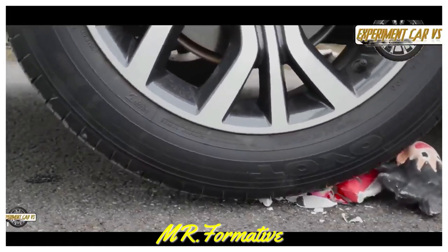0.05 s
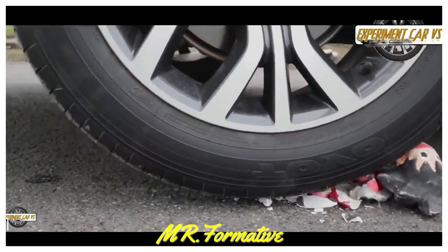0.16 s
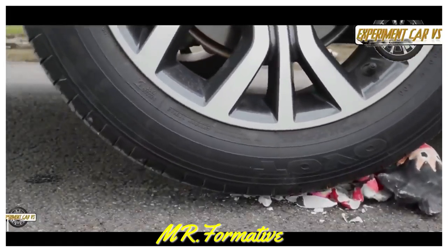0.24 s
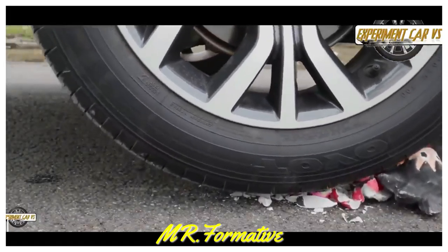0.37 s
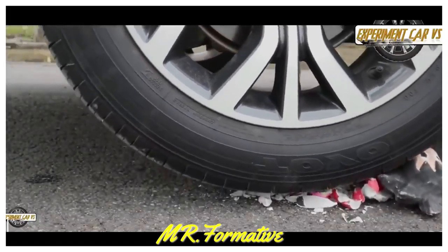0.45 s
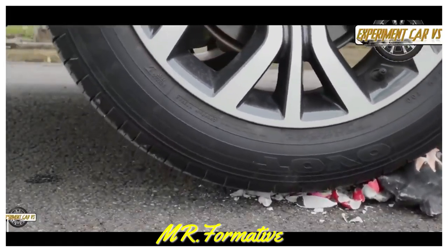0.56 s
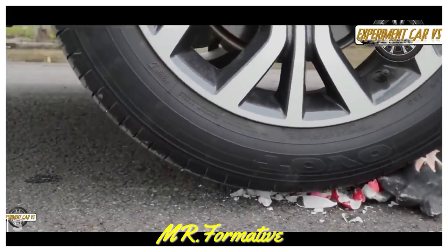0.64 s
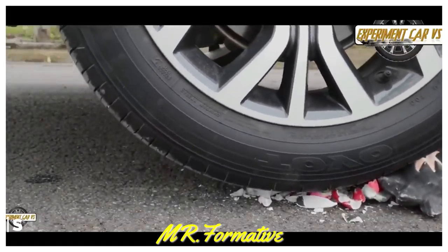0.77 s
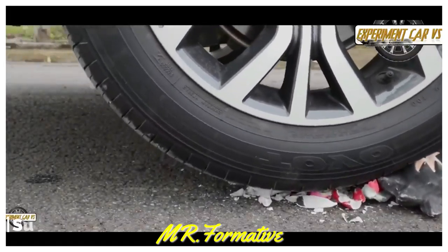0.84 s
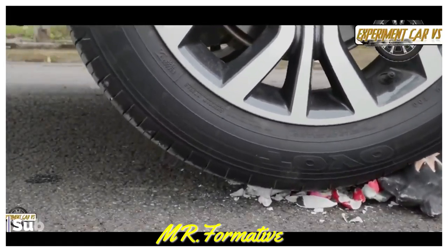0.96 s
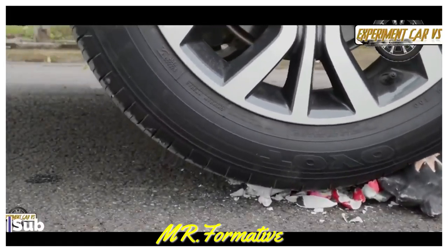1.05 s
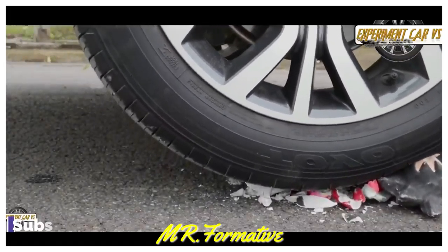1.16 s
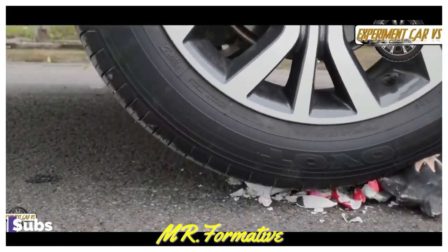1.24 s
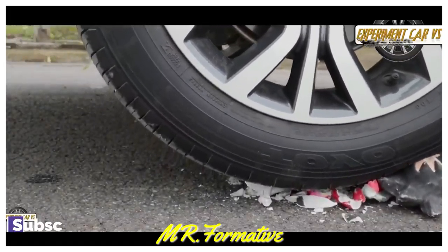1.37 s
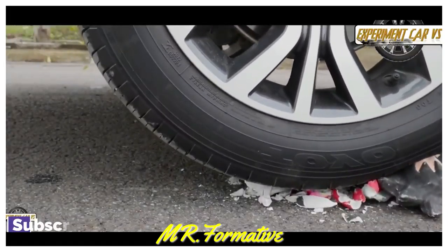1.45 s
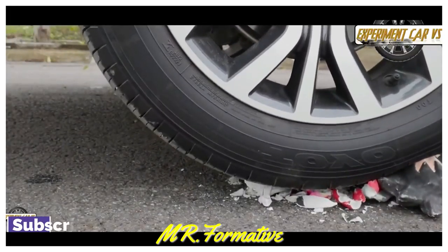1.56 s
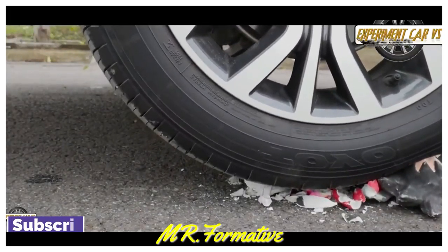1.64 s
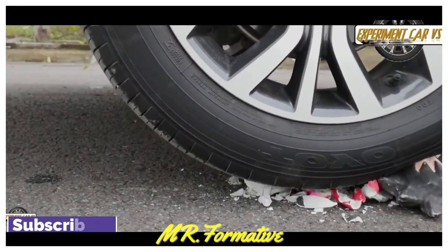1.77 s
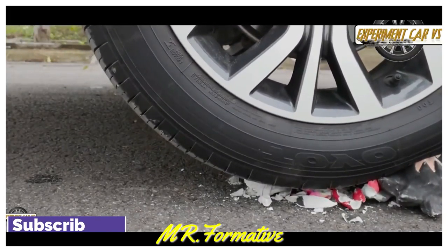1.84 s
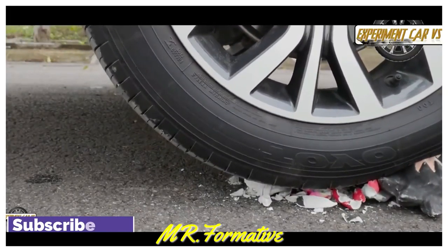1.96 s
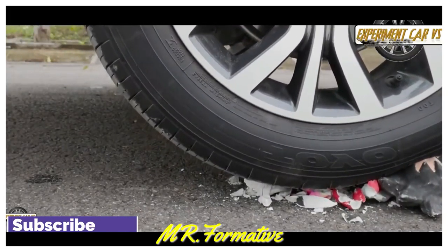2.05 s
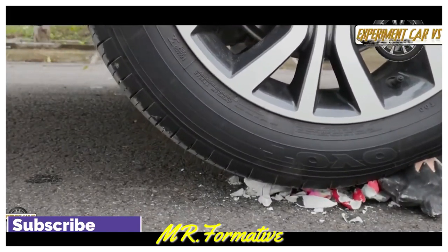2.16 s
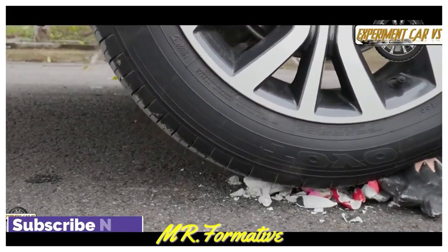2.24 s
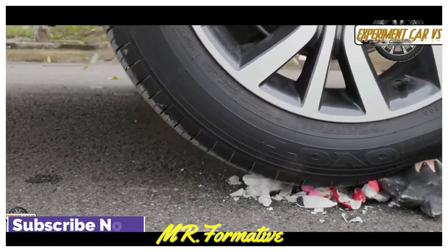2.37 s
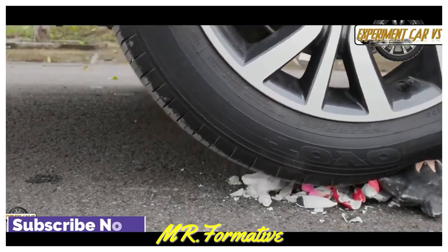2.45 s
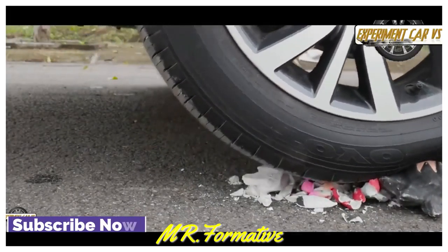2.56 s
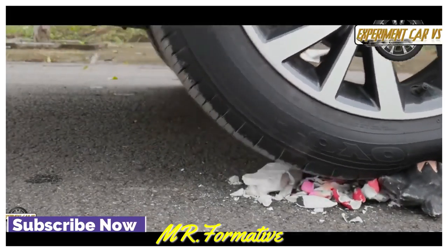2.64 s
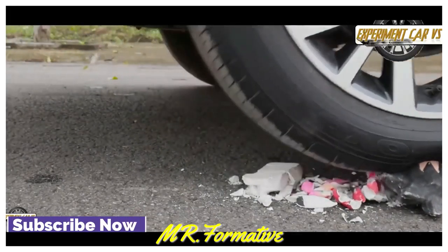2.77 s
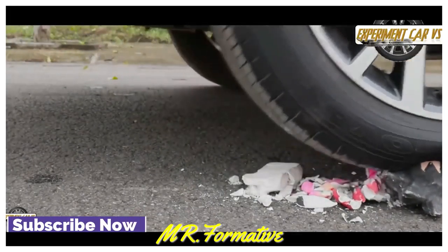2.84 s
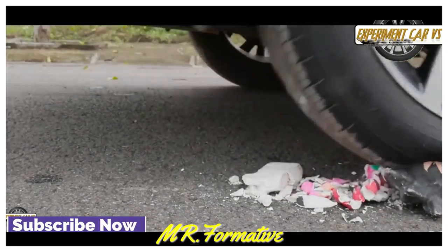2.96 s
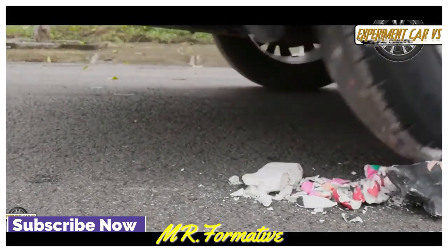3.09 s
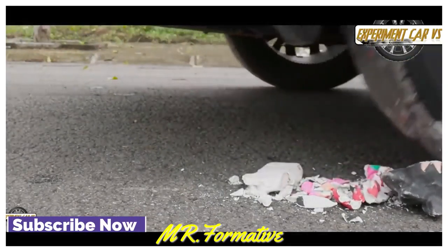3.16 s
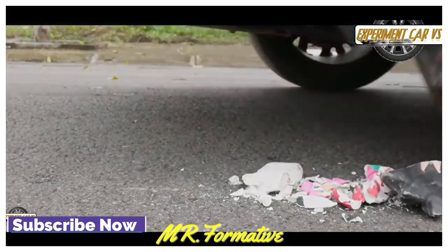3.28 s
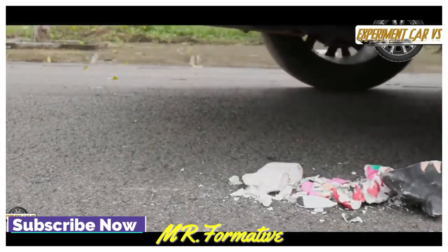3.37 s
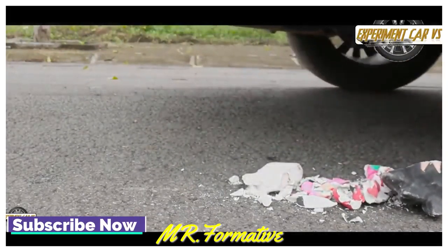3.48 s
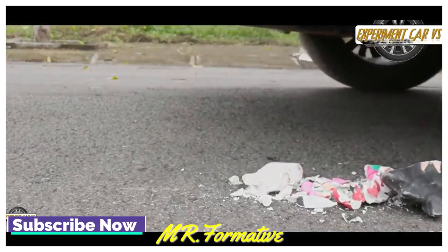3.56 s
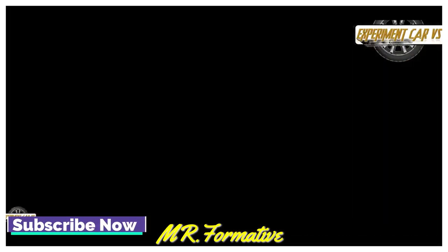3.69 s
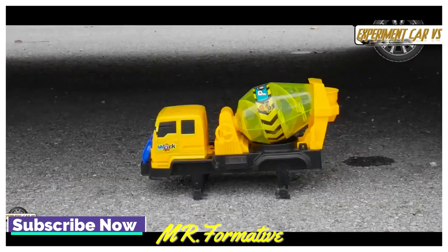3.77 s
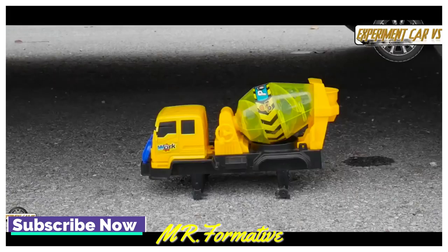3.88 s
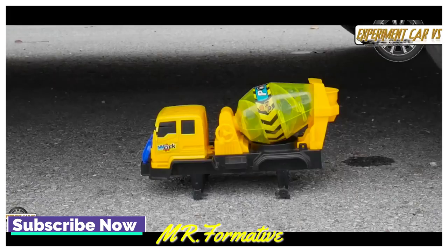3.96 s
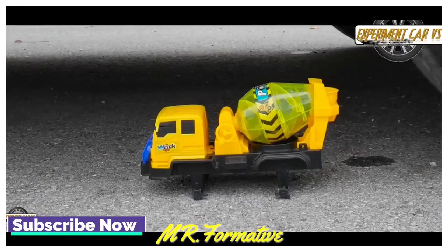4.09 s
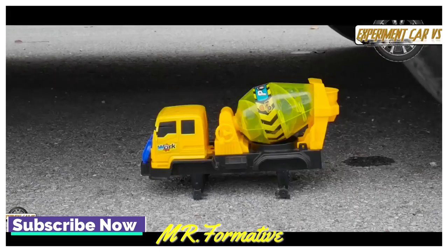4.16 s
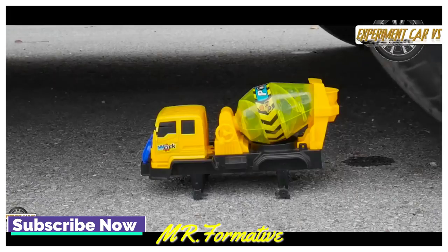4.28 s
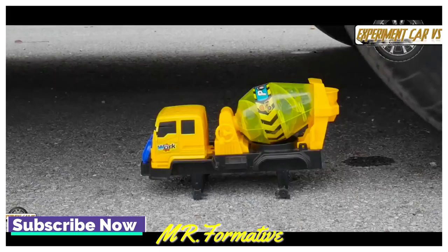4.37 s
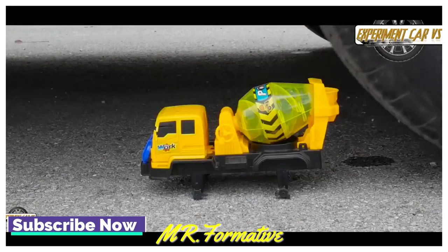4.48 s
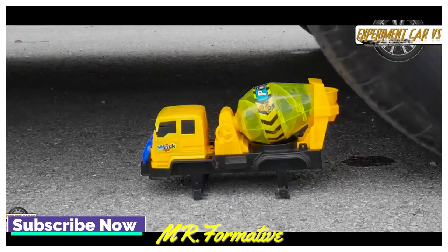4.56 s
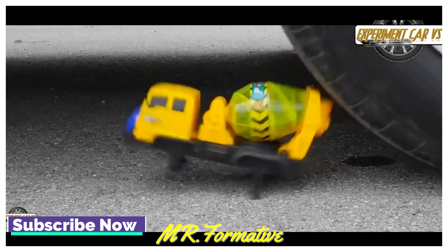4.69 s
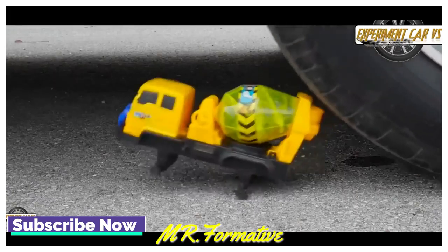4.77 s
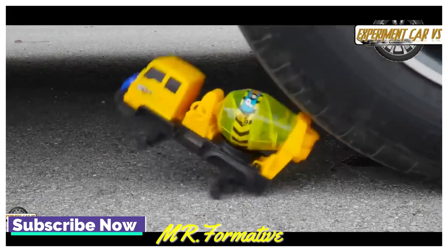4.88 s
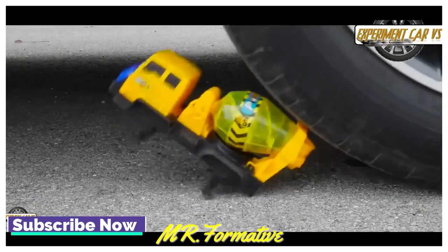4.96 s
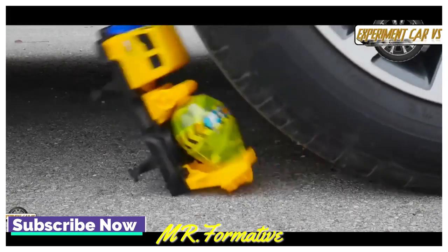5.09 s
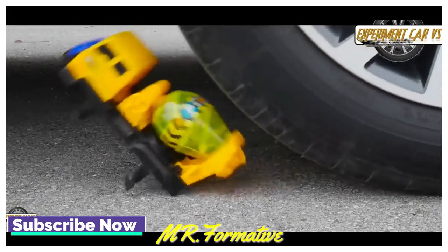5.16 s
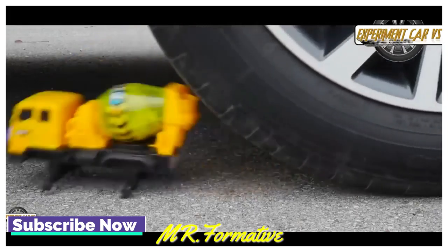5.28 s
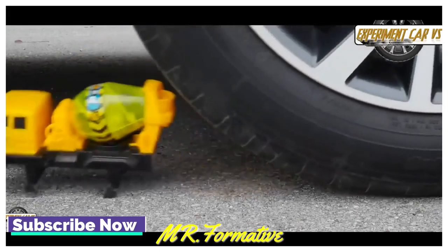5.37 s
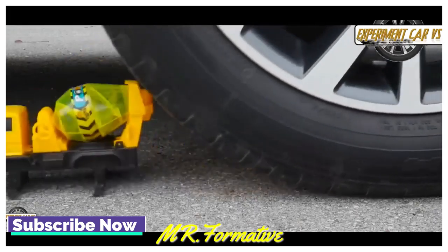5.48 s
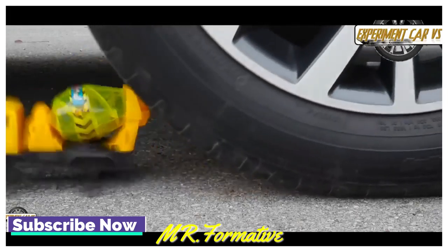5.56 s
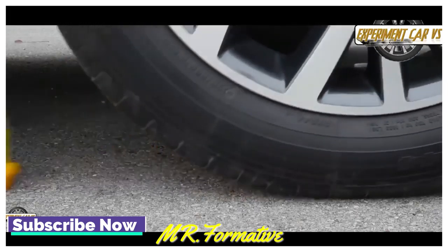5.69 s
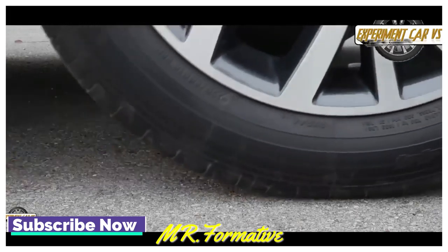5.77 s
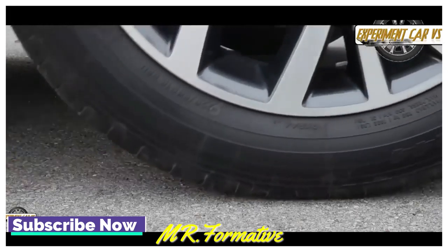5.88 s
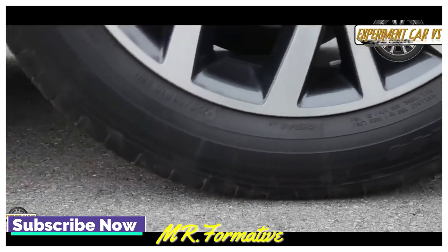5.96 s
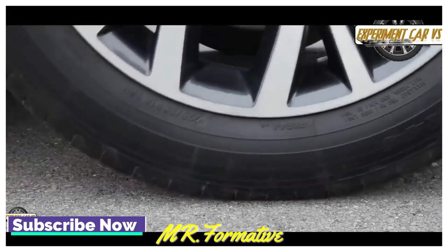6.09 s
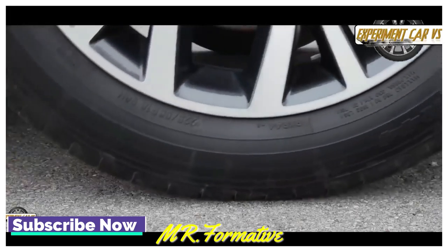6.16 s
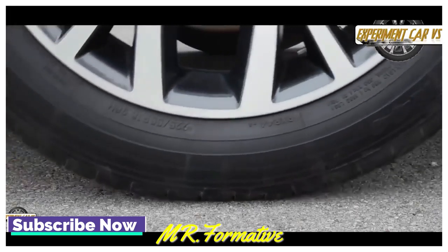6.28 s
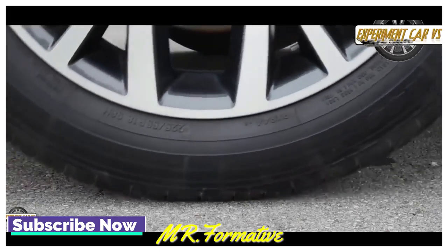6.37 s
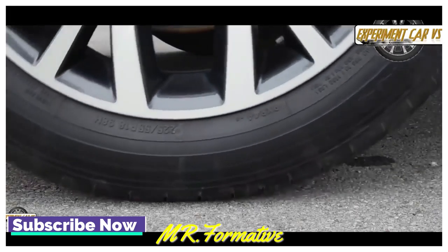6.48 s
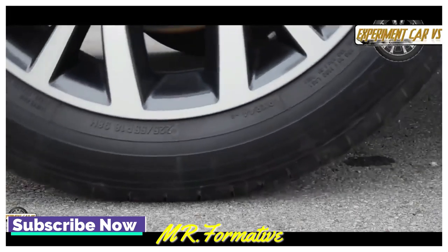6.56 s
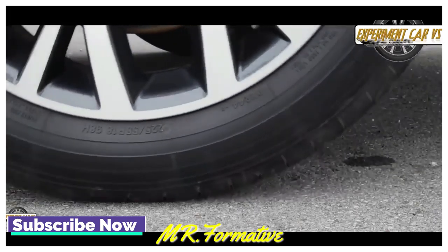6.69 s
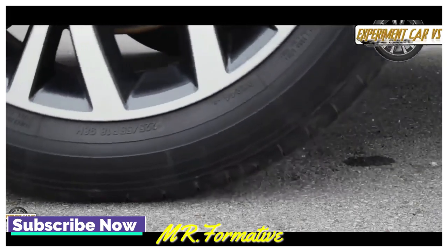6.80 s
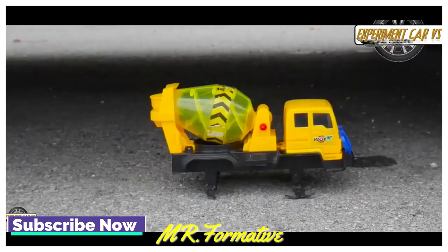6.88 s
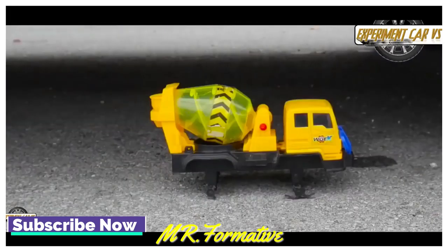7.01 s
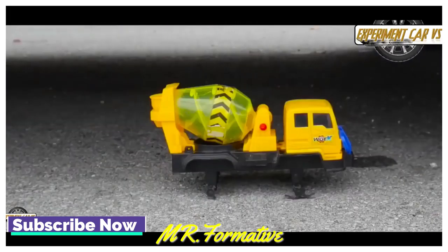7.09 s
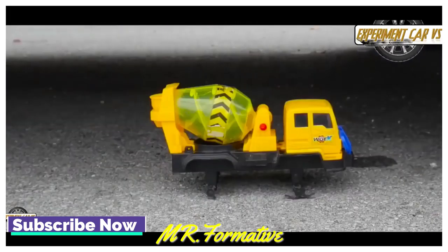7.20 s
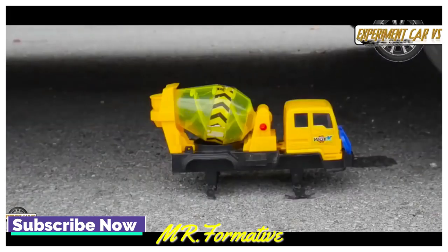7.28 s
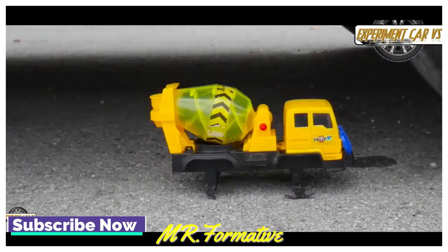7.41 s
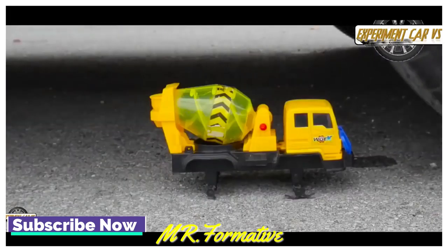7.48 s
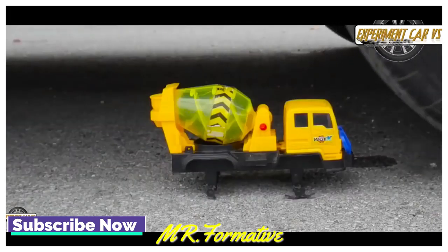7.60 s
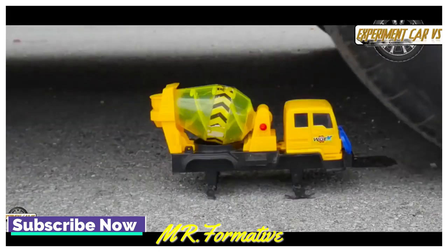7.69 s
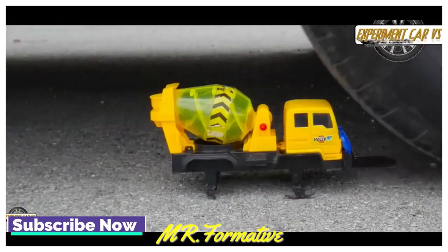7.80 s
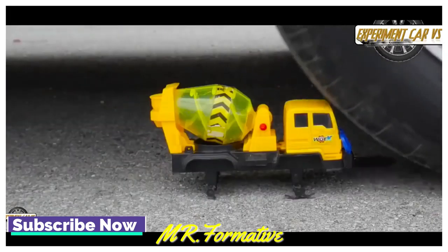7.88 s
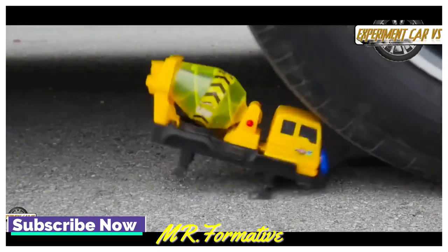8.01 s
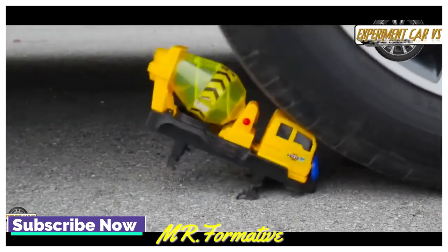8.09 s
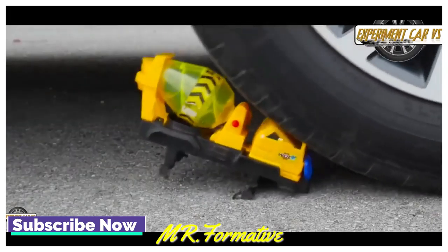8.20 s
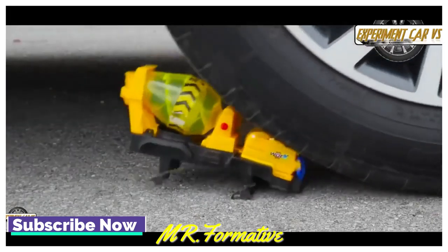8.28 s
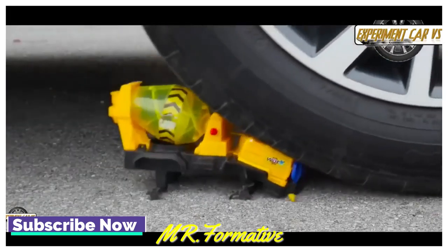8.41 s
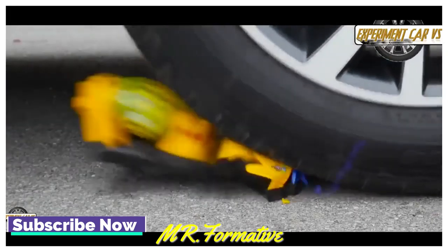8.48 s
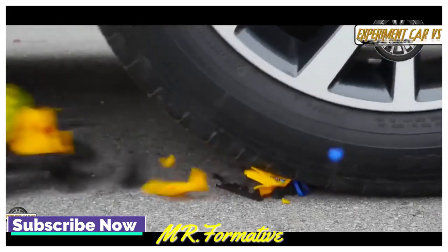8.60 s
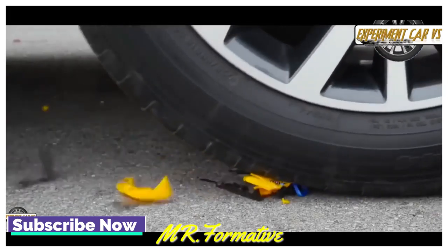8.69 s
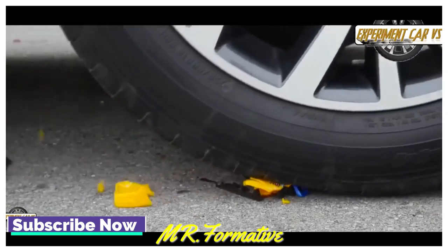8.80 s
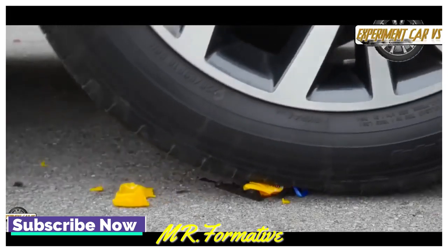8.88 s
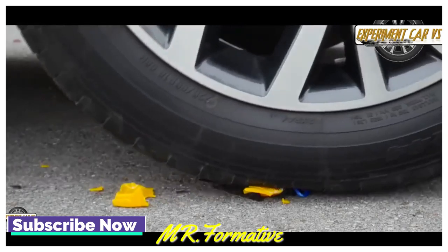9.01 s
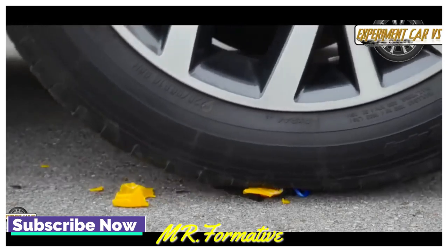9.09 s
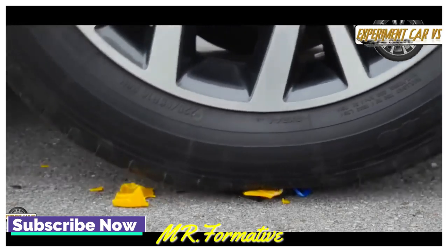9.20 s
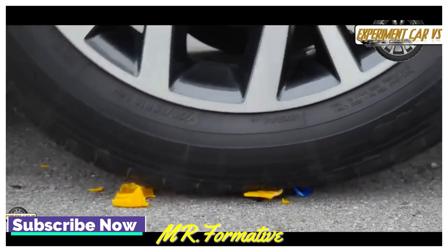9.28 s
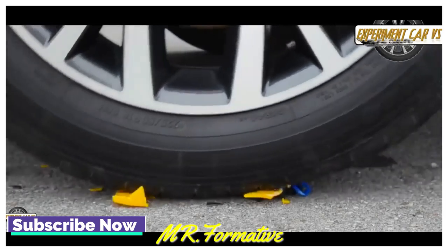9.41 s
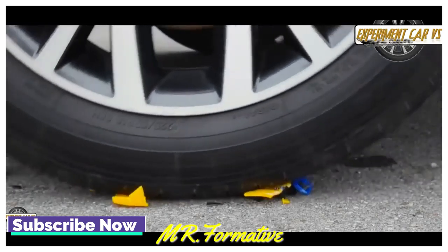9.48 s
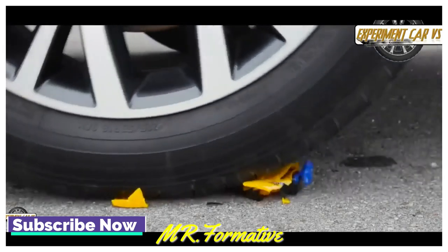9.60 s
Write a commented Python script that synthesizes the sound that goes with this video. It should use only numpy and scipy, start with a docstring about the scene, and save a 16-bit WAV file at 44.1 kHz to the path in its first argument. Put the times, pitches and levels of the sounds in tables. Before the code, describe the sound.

Close by a slow tyre, a hollow toy cracks and crumbles, a plastic truck rattles and scrapes along asphalt, then breaks with sharp snaps.

```python
"""On asphalt a car creeps over toys, heard by a microphone on the ground beside its tyre.
A brittle hollow figure caves in and its shards are ground down: dying swarms of tiny slips ring each piece.
A plastic toy truck is shoved along: scraping feet and knocks ring its panels and shell.
On the next pass the truck is caught and snaps to pieces. The tyre booms softly under the breaks,
over filtered-noise rolling and an engine hum."""
import sys
import numpy as np
from scipy import signal
from scipy.fft import rfft, irfft
from scipy.io import wavfile
from scipy.ndimage import uniform_filter1d

SR = 44100
rng = np.random.default_rng(int(sys.argv[2]) if len(sys.argv) > 2 else 0)


def file_out(sig):
    """Save sig as 16-bit WAV at sys.argv[1]."""
    # one column per channel
    cols = np.atleast_2d(sig).T
    # limit, then scale
    lim = np.clip(cols, -1, 1)
    pcm = np.round(lim * 32767).astype(np.int16)
    wavfile.write(sys.argv[1], SR, pcm)


N = 425565

# the figure caves in: (time [s], level [dB], decay [s], size of the piece [cm])
FIGURE_CRACKS = [(0.184, 18, 0.0024, 3.3), (0.2493, 13, 0.0038, 2.4), (0.268, 20, 0.0033, 1.8),
                 (0.353, 8, 0.0032, 1.8), (0.3655, 10, 0.0034, 2.2), (0.5123, 13, 0.00099, 1.5),
                 (0.519, 26.5, 0.0024, 2), (0.523, 21.5, 0.003, 7.4), (0.532, 17, 0.0046, 2.8),
                 (0.5667, 23, 0.0013, 1.87), (0.6357, 31.5, 0.0029, 2.03), (0.7267, 20, 0.004, 5.3),
                 (0.7321, 20, 0.0041, 1.7), (0.798, 14, 0.0055, 2.7), (2.2755, 27, 0.00074, 4.13),
                 (2.9225, 14.5, 0.00035, 2.9), (3.0096, 23.5, 0.0051, 2), (3.06, 15, 0.0047, 5.2),
                 (3.1383, 24, 0.0045, 4), (3.166, 16.5, 0.004, 6.5), (3.491, 13.5, 0.0022, 4.8),
                 (3.5026, 13.5, 0.015, 4.1)]
# colour of the figure's cracks: (frequency [Hz], relative level [dB])
FIGURE_COLOUR = [(60, -26), (120, -1), (200, 2.5), (600, -4.5), (1200, -7), (2500, -16), (4200, -14.5),
                 (7000, -18.5), (11000, -23), (15500, -39.5)]
# hollow body of the figure: (resonance [Hz], boost [dB])
FIGURE_BODY = [(285, 5.5), (590, 8), (850, 4)]
# colour of snapping plastic: (frequency [Hz], relative level [dB])
SNAP_COLOUR = [(40, -25), (200, -11), (400, -12.5), (850, -2), (1500, -6.5), (4000, -5.5), (5500, -8),
               (7500, -6.5), (11500, -6.5), (13000, -14.5), (15500, -20)]
# colour of the truck against the road: (frequency [Hz], relative level [dB])
KNOCK_COLOUR = [(40, -40), (130, -20.5), (400, -20.5), (600, -11), (820, -3), (1150, -5.5), (2100, -5.5),
                (2700, -10.5), (4300, -10), (5500, -17.5), (7200, -18.5), (11000, -24.5), (15500, -39.5)]
# hollow body of the truck: (resonance [Hz], level [dB])
SHELL = [(795, 1), (875, -3)]
# where the four tilts of a burst's colour apply: frequency [Hz]
TILT_HZ = [250, 850, 3000, 10000]
# the pause between two passes: start [s], end [s]
SILENCE = (3.735, 3.875)
SHELL_FLEX = 0.05  # share by which the pitch of the truck's shell typically shifts as it flexes
RIPPLE_DB = 3.4  # how unevenly each piece rings across the treble


def gain_of(db):
    """Decibels to amplitude."""
    return 10 ** (np.asarray(db) / 20)


def evened(x):
    """Scales to rms 1."""
    return x / np.sqrt(np.mean(x ** 2) + 1e-20)


def read(points, hz):
    """Reads (Hz, value) rows on a log-frequency axis."""
    f, value = np.transpose(points)
    return np.interp(np.log(hz + 1), np.log(f + 1), value)


def curves(rows):
    """Each column of a timed table, sample by sample."""
    s, *columns = np.transpose(rows)
    return [np.interp(np.arange(N) / SR, s, c) for c in columns]


def add(mix, s, sound):
    """Mixes a sound in at time s."""
    part = mix[max(round(s * SR), 0):][:len(sound)]
    part += sound[:len(part)]


def wander(hz):
    """Slow chance of rms 1, up to about hz."""
    lowpass = np.exp(-(np.fft.rfftfreq(N, 1 / SR) / hz) ** 2)
    return evened(irfft(rfft(rng.standard_normal(N)) * lowpass, N))


def causal(gain):
    """The spectrum with this magnitude that starts sharply and rings afterwards."""
    log_gain = np.log(np.maximum(gain, 1e-5))
    circle = np.concatenate([log_gain, log_gain[-2:0:-1]])
    return np.exp(np.conj(signal.hilbert(circle)))[:len(gain)]


def ring(x, modes):
    """Dying modes (Hz, dB, t60 s) driven by x; each has its dB as gain at resonance."""
    t = np.arange(SR) / SR
    response = 0
    for hz, db, t60 in modes:
        fade = gain_of(-60 * t / t60)
        onset = np.minimum(t * hz, 1)
        response = response + gain_of(db) * 2 * fade / fade.sum() * np.sin(2 * np.pi * hz * t) * onset
    return signal.oaconvolve(x, response)[:N]


def resonate(x, hz, width):
    """A resonance of gain 1 that follows the curve hz."""
    turn = np.exp(2j * np.pi * np.cumsum(hz) / SR)
    r = np.exp(-np.pi * width / SR)
    # shift the resonance down to 0 Hz, smooth there, and shift back
    smooth = signal.lfilter([1 - r], [1, -r], x / turn + 1e-18)
    return 2 * (turn * smooth).real


def burst(colour, level_db, decay, tilts_db=(0, 0, 0, 0), clump=0, ripple_db=0, rings=(), rise=0.18,
          size=4096):
    """A dying swarm of tiny slips, coloured by the piece and its rings (Hz, width Hz, dB)."""
    t, hz = np.arange(size) / SR, np.fft.rfftfreq(size, 1 / SR)
    slips, sizes, peaks = rng.standard_normal((3, size))
    envelope = np.exp(clump * sizes - t / decay) * (1 - np.exp(-t / (rise * decay)))
    swarm = rfft(slips * envelope)
    # the slips share their energy over all pitches
    spread = np.sqrt(uniform_filter1d(abs(swarm) ** 2, size=110))
    # each piece has its own high resonances
    ripple = evened(uniform_filter1d(uniform_filter1d(peaks, size=40), size=20))[:len(hz)]
    ripple = ripple * np.tanh(hz / TILT_HZ[2])
    shape_db = level_db + read(colour, hz) + read(list(zip(TILT_HZ, tilts_db)), hz) + ripple_db * ripple
    for ring_hz, width, db in rings:
        shape_db += db / (1 + (2 * (hz - ring_hz) / width) ** 2)
    return irfft(swarm * causal(gain_of(shape_db) / spread))


def deformed(body):
    """The rings of a hollow body (Hz, width Hz, dB), a little shifted each time it is squashed."""
    body_q, shift = 6, 0.07  # sharpness of the rings; typical share by which their pitch shifts
    return [(hz * np.exp(shift * rng.standard_normal()), hz / body_q, db) for hz, db in body]


def breaks(rows, colour, clump, focus_db, purity, body=(), ring_width_hz=900, ring_db=8):
    """Pieces give way under the tread, each loudest at its own pitch and weaker per octave away from it."""
    piece_hz = 11830  # pitch of a piece 1 cm across; it falls with the square of the size
    clean_snap_s = 0.0018  # here the loss per octave is focus_db; longer cracks are less pitched
    out = np.zeros(N)
    for s, level_db, decay, size_cm, *ring_hz in rows:
        octaves = abs(np.log2(np.array(TILT_HZ) * size_cm ** 2 / piece_hz))
        tilts_db = -focus_db * (clean_snap_s / decay) ** purity * (octaves - octaves.mean())
        rings = [(hz, ring_width_hz, ring_db) for hz in ring_hz] + deformed(body)
        add(out, s, burst(colour, level_db, decay, tilts_db, clump, RIPPLE_DB, rings))
    return out


def grains(per_s, spread_db):
    """Sparse clicks at rms 1: most are small, a few large."""
    signs = np.sign(rng.standard_normal(N))
    sizes = gain_of(spread_db * np.minimum(rng.exponential(1, N), 3))
    present = rng.random(N) < per_s / SR
    return evened(signs * sizes * present)


def chips(per_s=160, spread_db=4, decay=0.0006, ripple_db=6, count=10):
    """Small shards split under the tread; each of a few kinds has a ring of its own."""
    out = np.zeros(N)
    for _ in range(count):
        shard = evened(burst(SNAP_COLOUR, 0, decay, ripple_db=ripple_db))
        out += signal.oaconvolve(grains(per_s / count, spread_db), shard)[:N]
    return evened(out)


def car_levels():
    """Rumble, road noise and grit in dB, and the share of crunch: the idling car with the rolls over it."""
    # the car stands idling: (until [s], rumble [dB], hiss [dB])
    idling = [(3.64, -52, -48.5), (6.548, -61, -55.5), (6.999, -63.5, -60), (9.7, -59, -56.5)]
    # the tyre rolls: (full level from [s], full level until [s], rumble [dB],
    # road noise at mid-roll [dB], grit at mid-roll [dB], share of crunch [0-1])
    rolls = [(0.0, 0.276, -43.5, -43, -46, 0.4), (0.616, 0.8, -45.5, -51.5, -48.5, 0.5),
             (2.396, 3.2, -36.5, -39.5, -43.5, .2), (4.782, 6.412, -52, -41.5, -47, .4),
             (8.3, 9.38, -54.5, -54, -45, 0.76)]
    swell_db_per_s, die_db_per_s = 63.5, 84  # the rise before a roll and the fall after it
    build_db = 3  # growth of road noise and grit over a roll, as debris gathers under the tread
    idle_grit_db = -4  # fine hiss, relative to the hiss
    t, crunch = np.arange(N) / SR, np.zeros(N)
    until, rumble_db, hiss_db = np.transpose(idling)
    idle_db = np.array([rumble_db, hiss_db, hiss_db + idle_grit_db])
    power = gain_of(idle_db)[:, np.searchsorted(until[:-1], t)] ** 2
    for start, end, rumble_db, road_db, grit_db, share in rolls:
        slopes_db = np.minimum((t - start) * swell_db_per_s, (end - t) * die_db_per_s)
        swell_db = np.minimum(0, slopes_db)
        debris_db = swell_db + build_db * np.interp(t, [start, end], [-.5, .5])
        power += gain_of([rumble_db + swell_db, road_db + debris_db, grit_db + debris_db]) ** 2
        crunch += share * gain_of(swell_db)
    return *(10 * np.log10(power)), np.clip(crunch, 0, 1)


def street_band(x, lo_hz, hi_hz):
    """One band of x in the colour of the street, at rms 1."""
    # street and tyre noise: (frequency [Hz], relative density [dB per Hz])
    street = [(45, -11), (90, 0), (330, -6.5), (780, 6), (1500, -3), (2400, -8), (3300, -5), (5500, -12.5),
              (8300, -18), (11300, -15), (12600, -22), (15500, -27)]
    hz = np.fft.rfftfreq(N, 1 / SR) + 1
    band = 1 / np.sqrt((1 + (lo_hz / hz) ** 8) * (1 + (hz / hi_hz) ** 8))
    return evened(irfft(rfft(x) * band * gain_of(read(street, hz)), N))


def rolling(rumble_db, road_db, grit_db, share, lumpy_db=5):
    """Tread rumble and road noise; on debris part of the hiss is splitting chips, in uneven lumps."""
    low, middle, high = rng.standard_normal((3, N))
    crunch = chips()
    rumble = gain_of(rumble_db) * street_band(low, 75, 450)
    road = gain_of(road_db) * street_band(middle + share * crunch, 450, 2500)
    gritty = np.sqrt(1 - share) * high + np.sqrt(share) * crunch
    grit = gain_of(grit_db) * street_band(gritty, 2200, SR / 2)
    lumps = gain_of(lumpy_db * share * wander(25))
    return rumble + lumps * (road + grit)


def engine(rumble_db, follow=1.4, offset_db=7.5, waver=0.003):
    """A low hum at the firing rate, which swells with the rumble as the car climbs onto the toys."""
    # engine speed: (time [s], firing rate [Hz])
    firing = [(2.1, 55.6), (2.65, 72.8), (2.9, 76.1), (3.5, 65.4)]
    # overtones: (multiple of the firing rate, relative level [dB])
    orders = [(1, -2), (2, -7.5), (6, -7.5)]
    hz, = curves(firing)
    turns = np.cumsum(hz * (1 + waver * wander(14.0))) / SR
    hum = sum(gain_of(db) * np.sin(2 * np.pi * k * turns) for k, db in orders)
    return gain_of(follow * rumble_db + offset_db) * hum


def thumps():
    """The tyre drops onto the road as something gives way: each drop is one push on the tread."""
    # drops: (time [s], push that drives the tyre [dB])
    drops = [(0.0, 29), (0.271, 22.5), (0.52, 41), (0.566, 35), (0.638, 26), (0.728, 32), (2.277, 34.5),
             (3.01, 27.5), (5.765, 22), (8.534, 28), (8.689, 25.5), (8.834, 24.5)]
    out = np.zeros(N)
    for s, level_db in drops:
        add(out, s, gain_of([level_db]))
    return out


def rubber_thud(drops):
    """The rubber answers each drop with a short, low, damped mode."""
    # rubber: (resonance [Hz], gain [dB], t60 [s])
    rubber = [(120, -6.5, 0.36)]
    return ring(drops, rubber)


def tyre(blows, wave_db, cavity_db, start_hz=330, end_hz=115, first=0.018, last=0.066):
    """A blow rings the air in the tyre and sends a bending wave round the tread; high notes return first."""
    cavity_hz, cavity_t60 = 204.2, 1.1  # the air ring inside the tyre (Hz, s)
    t = np.arange(0, last - first, 1 / SR)
    hz = start_hz * (end_hz / start_hz) ** (t / t[-1])
    # the tread scatters the wave, which blurs its phase
    scatter = evened(uniform_filter1d(rng.standard_normal(SR), size=600))[:len(t)]
    phase = 2 * np.pi * np.cumsum(hz) / SR + uniform_filter1d(scatter, size=100)
    chirp = signal.windows.tukey(len(t), .5) * np.sin(phase)
    out = ring(blows, [(cavity_hz, cavity_db, cavity_t60)])
    add(out, first, gain_of(wave_db) * signal.oaconvolve(blows, chirp / abs(rfft(chirp)).max()))
    return out


def underbody(x):
    """Dense reflections between road and car, the treble dying first."""
    # echo: (frequency [Hz], t60 [s])
    echo_times = [(800, 0.15), (12000, 0.096)]
    taps = rng.standard_normal(SR // 2)
    hz, t, z = signal.stft(taps, SR, nperseg=256)
    fade = gain_of(-60 * t / read(echo_times, hz)[:, None])
    tail = signal.istft(z * fade, SR, nperseg=256)[1]
    tail *= 1 - np.exp(-np.arange(len(tail)) / SR / 0.011)  # the echo builds up over some 11 ms
    return signal.oaconvolve(x, tail / np.linalg.norm(tail))[:N]


def caving_in():
    """The hollow figure cracks piece by piece, its squashed body ringing with each crack."""
    return breaks(FIGURE_CRACKS, FIGURE_COLOUR, clump=0.55, focus_db=4.5, purity=0.37, body=FIGURE_BODY)


def crumbling(below_db=-14, decay=0.01):
    """After each crack of the figure, crumbs break off its edge in a ragged tail."""
    out = np.zeros(N)
    for s, level_db, *_ in FIGURE_CRACKS:
        crumbs = burst(FIGURE_COLOUR, level_db + below_db, decay, clump=0.94, ripple_db=RIPPLE_DB, rise=1)
        add(out, s, crumbs)
    return out


def ticks(figure_decay=0.0011, truck_decay=0.0008, bright_db=4):
    """Single shards split: the figure's with a dull tock, the truck's with a thin, bright click."""
    # loose shards tick under the tread: (time [s], level [dB])
    shards = [(0.2856, 15.5), (1.3689, 8.5), (2.272, 17), (2.3923, 9.5), (2.646, 11), (2.699, 8),
              (2.7272, 13.5), (2.8446, 16), (2.932, 13), (2.9582, 13.5), (2.98, 13), (2.991, 9), (3.096, 5),
              (3.225, 12.5), (8.43, 1), (8.473, 6.5), (8.523, 16), (8.7241, 7), (9.235, 7), (9.4243, -3),
              (9.4992, 8)]
    truck_tilts_db = (-bright_db, -bright_db, 0, bright_db)
    out = np.zeros(N)
    for s, level_db in shards:
        if s < SILENCE[0]:
            rings = deformed(FIGURE_BODY)
            tick = burst(FIGURE_COLOUR, level_db, figure_decay, ripple_db=RIPPLE_DB, rings=rings)
        else:
            tick = burst(SNAP_COLOUR, level_db, truck_decay, truck_tilts_db, ripple_db=RIPPLE_DB)
        add(out, s, tick)
    return out


def scrape(slips_per_s=1800, slip_db=4.5, judder_db=8, judder_hz=130, screech_hz=1650, screech_db=-1,
           groan_db=-8):
    """Plastic feet stick and slip in uneven judders; the shell groans and a screech wanders in pitch."""
    # the truck's feet drag over the asphalt: (start [s], end [s], level [dB])
    drags = [(4.836, 4.88, -18.5), (4.965, 5.212, -23.5), (5.38, 5.833, -27), (5.88, 6.34, -40.5),
             (6.305, 6.431, -23.5), (8.092, 8.319, -18)]
    pressure, hz = np.zeros(N), np.fft.rfftfreq(N, 1 / SR)
    for start, end, level_db in drags:
        window = signal.windows.tukey(max(int((end - start) * SR), 2), .5)
        add(pressure, start, gain_of(level_db) * window)
    judder = gain_of(judder_db * np.tanh(wander(judder_hz)))
    slips = grains(slips_per_s, slip_db) * judder
    body = evened(irfft(rfft(slips) * causal(gain_of(read(KNOCK_COLOUR, hz))), N))
    # the contact with the rough road shifts, and the screech with it
    screech = resonate(body, screech_hz * 2 ** (.22 * wander(30)), 180)
    groan = resonate(body, SHELL[0][0] * (1 + SHELL_FLEX * wander(20)), 70)
    voices = gain_of(screech_db) * evened(screech) + gain_of(groan_db) * evened(groan)
    return pressure * evened(body + voices)


def rattle(clump=.6, strike_db=-2.5, chatter_db=-8.0, chatter_s=0.01):
    """The shoved truck drags and hops: strikes ring a panel, loose parts chatter, the flexing shell rings."""
    # the truck hits the road: (time [s], level ahead of the strike and chatter offsets [dB],
    # brightness [dB], ring of the struck panel [Hz])
    knocks = [(4.855, 30, -2.5, 1900), (4.9018, 30, -6, 2350), (4.9127, 25, 3.5, 4160),
              (4.9435, 23, -4.5, 1550), (5.002, 25, -4.5, 1540), (5.0122, 26, 5.5, 1530),
              (5.0235, 25.5, -3, 910), (5.031, 27.5, -3, 1900), (5.0562, 26, -6.5, 1630),
              (5.1222, 27.5, 7, 2950), (5.1527, 24.5, -27, 1230), (5.1676, 34.5, -6, 1070),
              (5.1783, 27, 5, 2240), (5.2445, 30, 9, 6850), (5.263, 16.5, -3, 820), (5.2857, 28, 0.5, 1730),
              (5.4156, 26, -14, 2080), (5.4514, 27, 1, 1590), (5.4815, 29, -5, 1770),
              (5.5101, 26.5, -2, 1280), (5.5507, 22.5, -5, 1340), (5.6002, 27.5, -1, 940),
              (5.6487, 24.5, -2, 3760), (5.6798, 19.5, 3, 3000), (5.7206, 22, -11, 1350),
              (5.7582, 30.5, -7, 1240), (5.7695, 37, -3, 1990), (5.896, 31, 6.5, 7100),
              (5.971, 25.5, 2, 837), (6.046, 27, 0.5, 3700), (6.123, 19.5, -4, 840),
              (6.2031, 30.5, -1.5, 4700), (6.2572, 23.5, -5, 1920), (6.3134, 26, -4.5, 4500),
              (6.357, 18.5, -5, 1870), (6.3813, 22, -7, 1260), (8.1336, 24.5, -7.5, 1490),
              (8.1504, 11, -11, 1700), (8.1613, 29.5, -14, 1470), (8.193, 19.5, -5, 1980),
              (8.206, 25, -16, 1840), (8.2207, 26.5, -43, 844), (8.2365, 23.5, 6, 890)]
    # a usual knock; harder ones are shorter, their decay halving every so many dB
    usual_db, usual_decay_s, halving_db = 22.5, 0.0033, 25.5
    # hard and bright knocks put less of their strength into the body of the toy
    body_per_db, body_per_bright_db = -0.08, -0.11
    panel_q, panel_db = 4.5, 9  # how sharply and how strongly the struck panel rings
    shell_t60 = 0.13  # s
    out = scrape()
    for s, level_db, bright_db, panel_hz in knocks:
        force_db = level_db - usual_db
        decay = usual_decay_s * .5 ** (force_db / halving_db)
        body_db = body_per_db * force_db + body_per_bright_db * bright_db
        tilts_db = (body_db / 2, body_db, 0, bright_db)
        panel = [(panel_hz, panel_hz / panel_q, panel_db)]
        # a loose part is smaller than the panel, and rings higher
        part_hz = panel_hz * (1 + rng.random())
        loose = [(part_hz, part_hz / panel_q, panel_db)]
        strike = burst(KNOCK_COLOUR, level_db + strike_db, decay, tilts_db, clump, RIPPLE_DB, panel, rise=1)
        chatter = burst(KNOCK_COLOUR, level_db + chatter_db, chatter_s, tilts_db, 0.86, RIPPLE_DB, loose)
        add(out, s, strike)
        add(out, s, chatter)
    flex = 1 + SHELL_FLEX * wander(21)
    width_hz = np.log(1000) / np.pi / shell_t60
    shell = sum(gain_of(db) * resonate(out, hz * flex, width_hz) for hz, db in SHELL)
    return out + shell


def snapping():
    """The caught truck snaps to pieces; each crack has one sharp resonance besides its own pitch."""
    # snaps: (time [s], level [dB], decay [s], size of the piece [cm], sharpest resonance [Hz])
    truck_snaps = [(8.3107, 25.5, 0.0019, 3.1, 1780), (8.3166, 23.5, 0.0014, 3.3, 1580),
                   (8.365, 26, 0.0037, 2.5, 11500), (8.4048, 23.5, 0.002, 2.8, 6700),
                   (8.4168, 20.5, 0.0045, 1.8, 3550), (8.4404, 26, 0.00076, 3.1, 4200),
                   (8.5168, 20.5, 0.0013, 2.4, 7250), (8.5342, 28.5, 0.0021, 5.6, 2450),
                   (8.6011, 9.5, 0.00078, 1.6, 11000), (8.6901, 29.5, 0.0049, 2.4, 4580),
                   (8.7323, 14, 0.0016, 1.6, 4040), (8.8327, 16.5, 0.0011, 1.25, 6770),
                   (8.9166, 5, 0.00021, 0.92, 7600), (9.0376, 18.5, 0.00037, 1.32, 3670),
                   (9.065, 14, 0.00044, 1.36, 7400), (9.1673, 22.5, 0.00077, 5.1, 4150),
                   (9.2575, 15.5, 0.0016, 3.8, 920), (9.3125, 19.5, 0.0017, 3.5, 1010),
                   (9.3199, 10.5, 0.0017, 0.81, 4130), (9.357, 7.5, 0.00017, 4.6, 1010),
                   (9.4635, 20.5, 0.00029, 3.56, 1110), (9.4659, 12, 0.0018, 1.5, 4400),
                   (9.5283, 19, 0.0019, 2.95, 6900)]
    return breaks(truck_snaps, SNAP_COLOUR, clump=0.52, focus_db=2.5, purity=0.32)


def skids():
    """Loose shards skid over the road, each with a short, dry rasp."""
    # skids: (time [s], level [dB], decay [s])
    rasps = [(8.803, 7.5, 0.0071), (8.944, 14.5, 0.013), (9.14, 18, 0.0048), (9.204, 8, 0.014)]
    # colour of a rasp: (frequency [Hz], relative level [dB])
    rasp_colour = [(200, -31), (2100, -2.5), (4800, -7.5), (15500, -26.5)]
    out = np.zeros(N)
    for s, level_db, decay in rasps:
        add(out, s, burst(rasp_colour, level_db, decay, clump=0.58, ripple_db=RIPPLE_DB))
    return out


def scene():
    """Almost everything sounds the same in both channels; only a faint, blurred hiss differs between them."""
    # level of a faint side hiss, ahead of its overall gain: (frequency [Hz], level [dB])
    side_hiss = [(60, -21), (700, -35.5), (15000, -3)]
    rumble_db, road_db, grit_db, crunch = car_levels()
    car = rolling(rumble_db, road_db, grit_db, crunch) + engine(rumble_db)
    drops = thumps()
    figure = caving_in() + crumbling()
    knocks = ticks() + rattle() + skids()
    snaps = snapping()
    boom = tyre(drops, wave_db=-9.5, cavity_db=8)
    boom += tyre(figure + gain_of(-5) * snaps, wave_db=-3.5, cavity_db=-9.0)
    echoing = gain_of(-19.5) * figure + gain_of(-21.5) * snaps + gain_of(-14.0) * knocks
    middle = figure + snaps + knocks + boom + rubber_thud(drops) + underbody(echoing) + car
    hiss_gain = gain_of(read(side_hiss, np.fft.rfftfreq(N, 1 / SR)))
    hiss = irfft(rfft(underbody(car)) * hiss_gain, N)
    side = gain_of(-44.5) * underbody(middle) + gain_of(-4.0) * hiss
    return np.array([middle + side, middle - side])


def record(dry, fade=0.053, ceiling=0.78):
    """The sound drops out between two passes; the loudest cracks overload; then the band limit."""
    edge_hz = 15900
    t = np.arange(N) / SR
    heard = np.clip(np.maximum(SILENCE[0] - t, t - SILENCE[1]) / fade, 0, 1)
    overloaded = heard * dry / (1 + (dry / ceiling) ** 6) ** (1 / 6)
    lowpass = signal.firwin(255, edge_hz, window=("kaiser", 8), fs=SR)
    return signal.oaconvolve(overloaded, lowpass[None], "same")


dry = scene()
out = record(dry)
file_out(out)
```